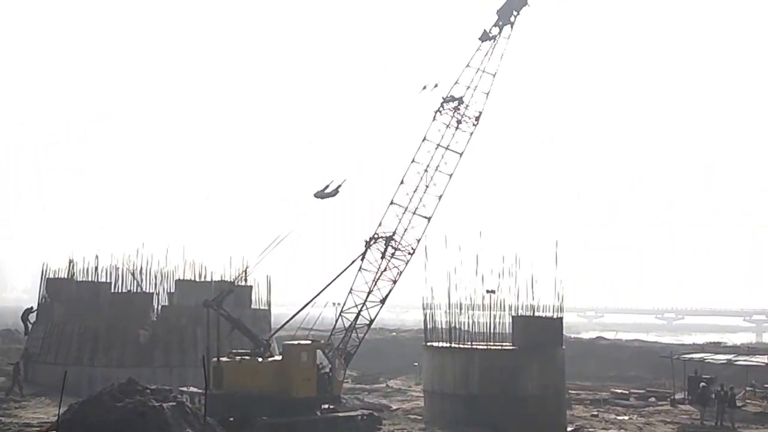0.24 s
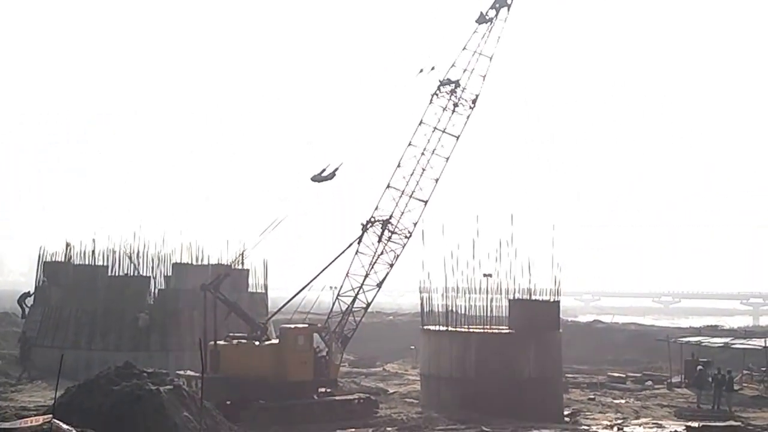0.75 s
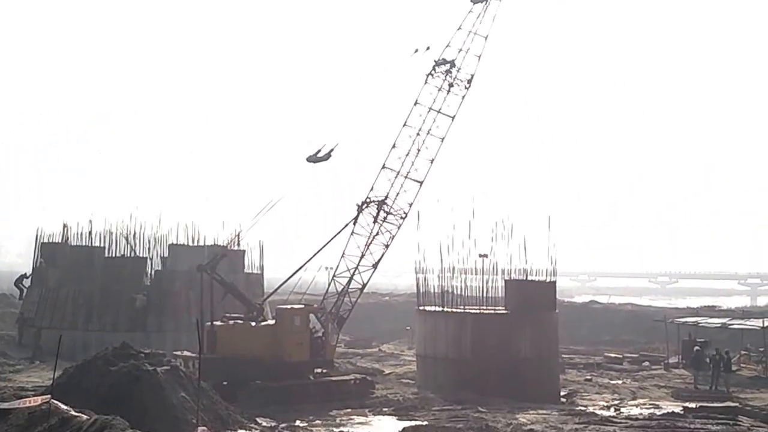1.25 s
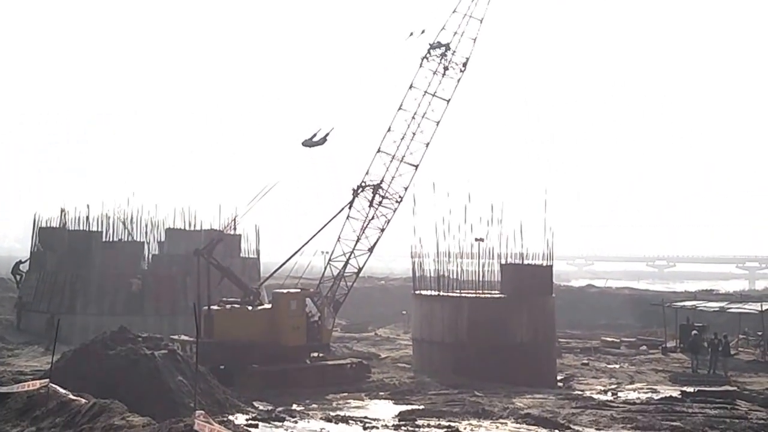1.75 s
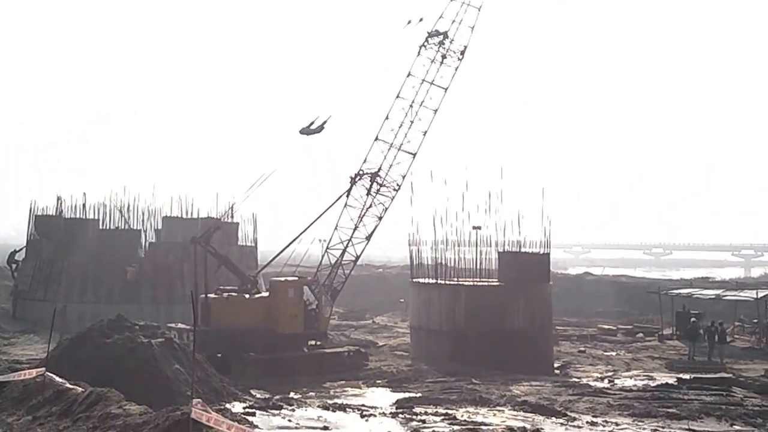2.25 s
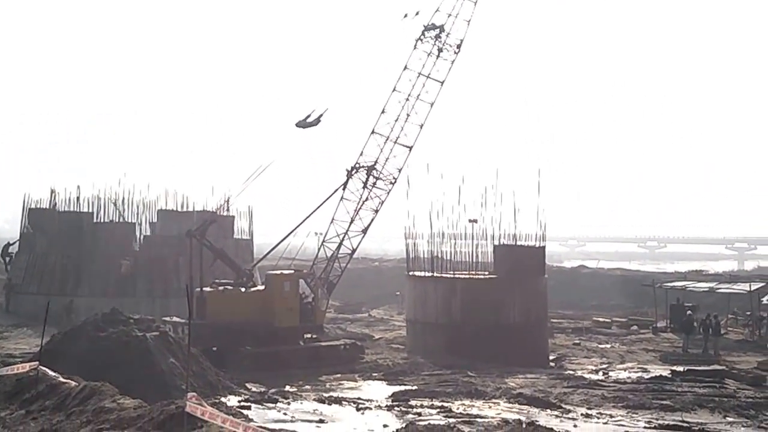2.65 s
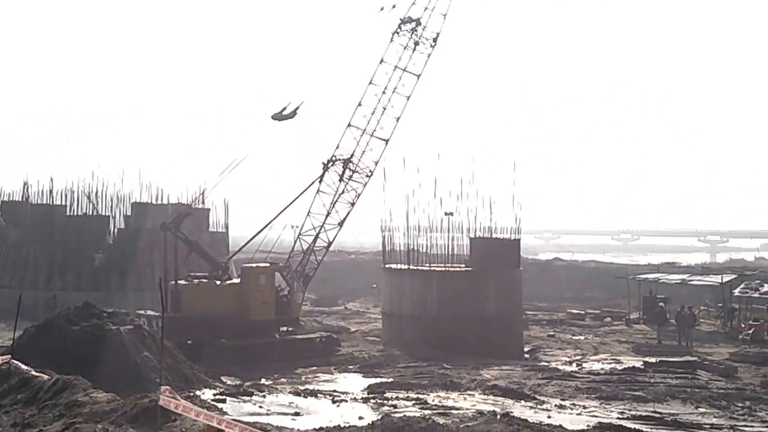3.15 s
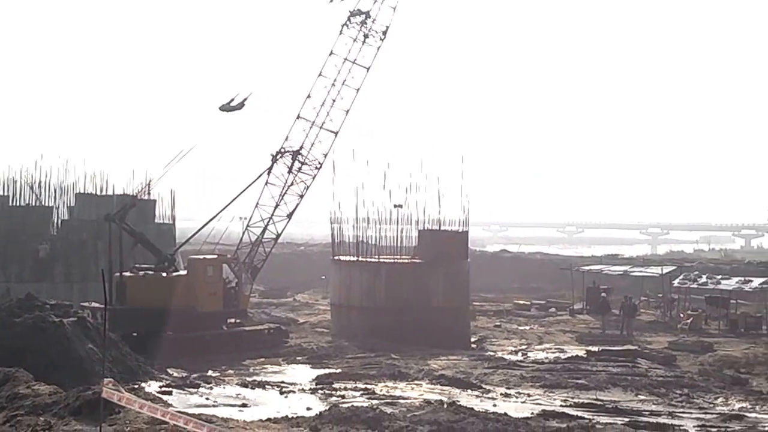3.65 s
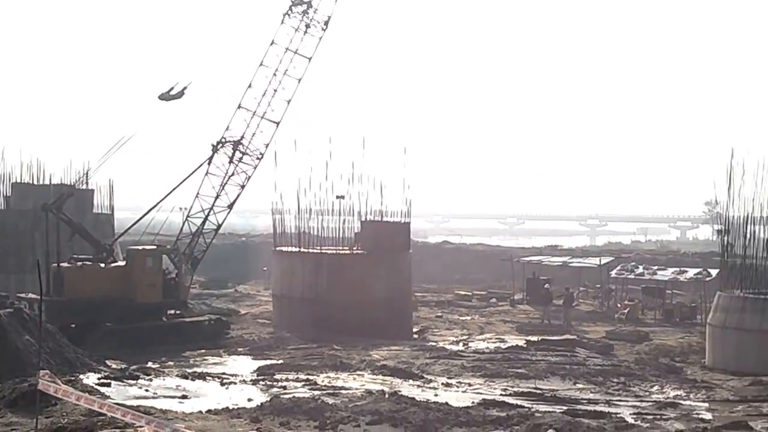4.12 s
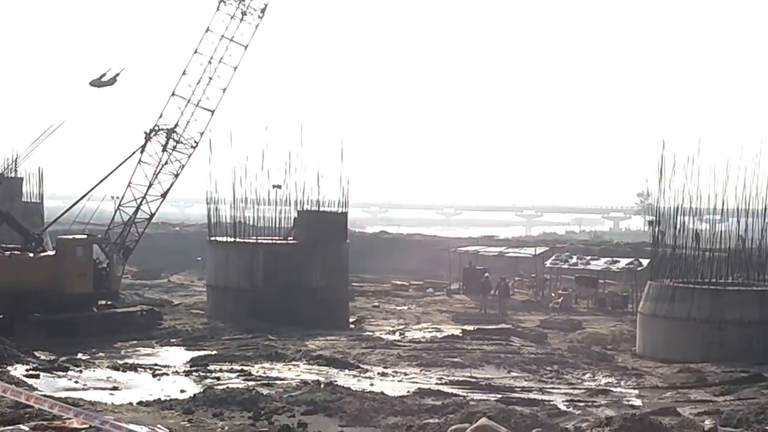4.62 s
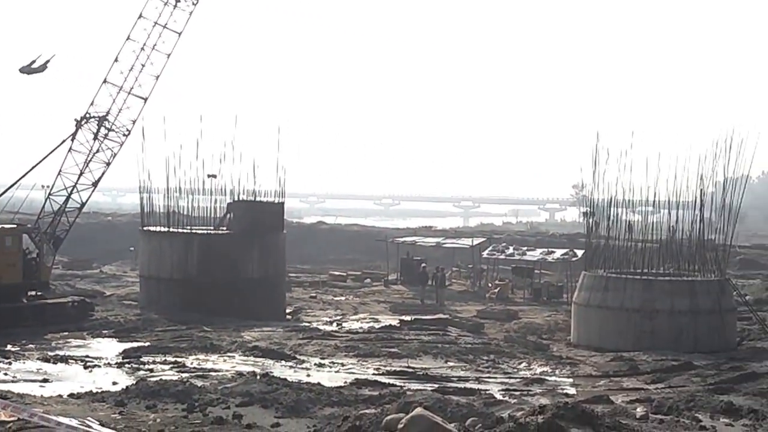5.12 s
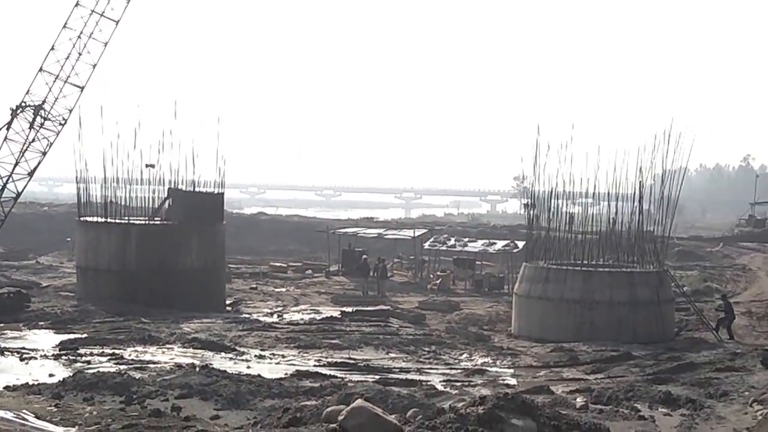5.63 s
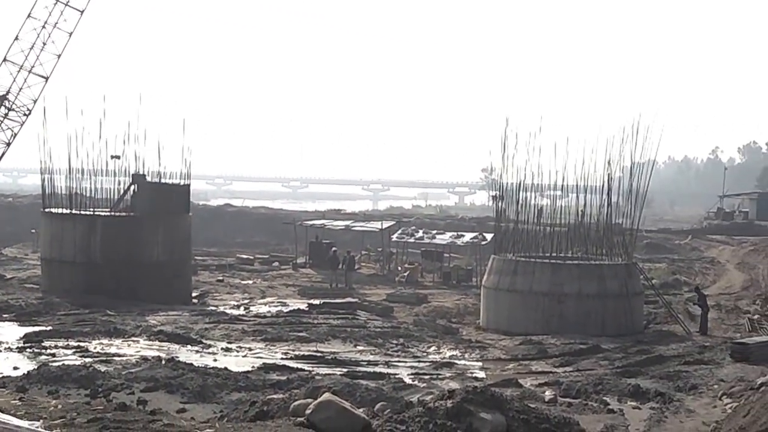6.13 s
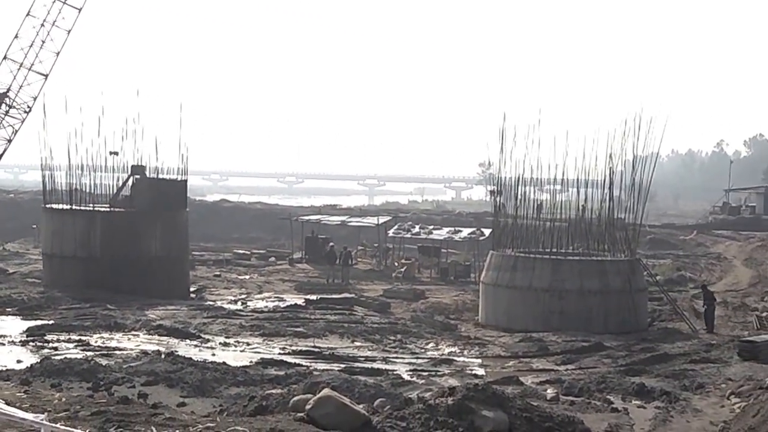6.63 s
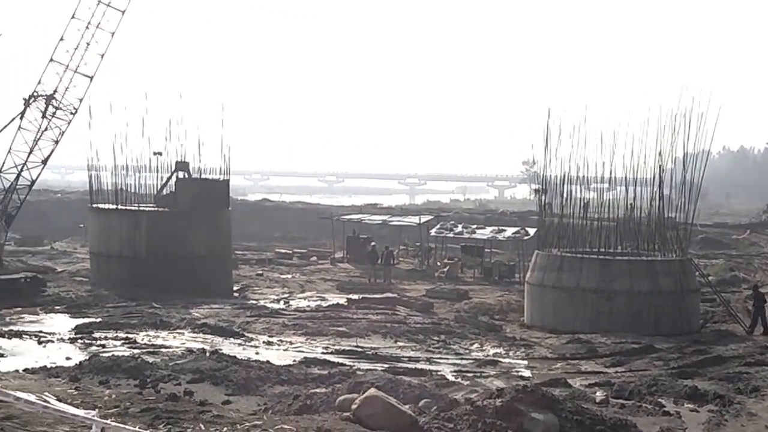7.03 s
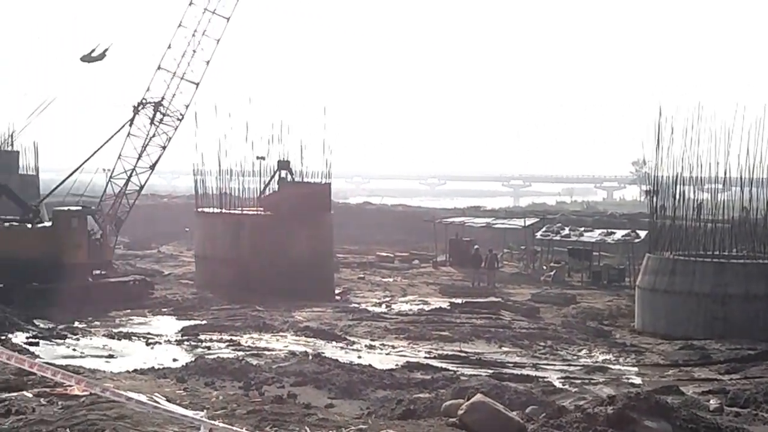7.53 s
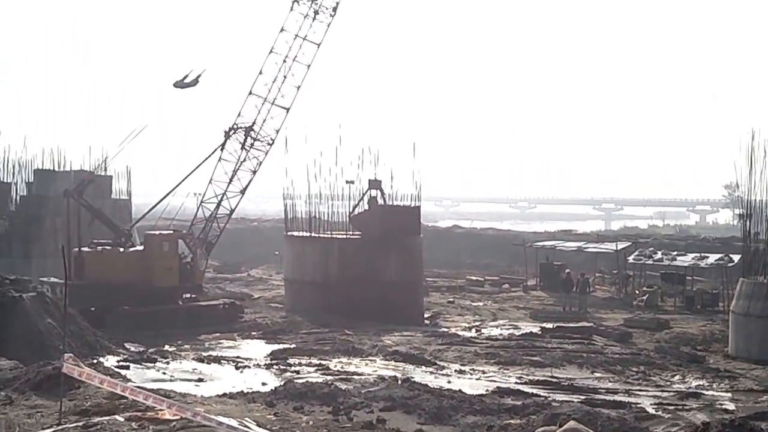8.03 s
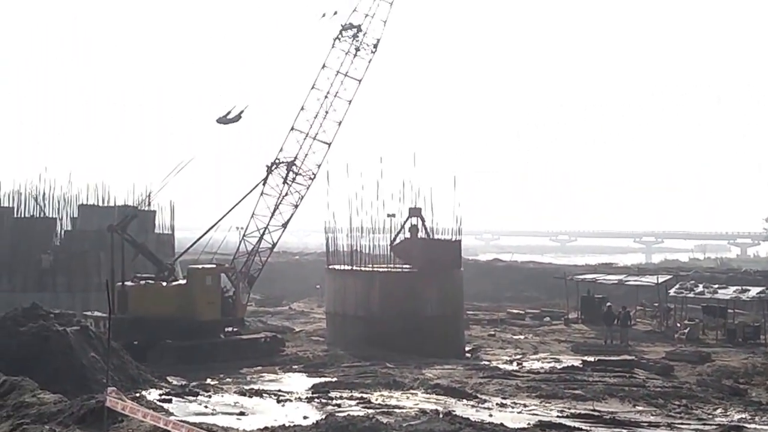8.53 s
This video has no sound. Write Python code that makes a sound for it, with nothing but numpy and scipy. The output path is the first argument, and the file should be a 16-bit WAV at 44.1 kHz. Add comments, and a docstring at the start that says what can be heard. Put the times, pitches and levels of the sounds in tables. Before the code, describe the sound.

Outdoors on a muddy building site, a crawler crane's diesel runs at near-constant speed: low rumble, rough casing roar and soft hiss. A pump drones unevenly beside it. Dull metal clacks come about three a second for the first three seconds; thin high squeals flicker over it, strongest after seven seconds. The sound is wide, distant and slightly hollow.

```python
"""A crawler crane's six-cylinder diesel runs at a near-steady speed on a building site: exhaust tones on
harmonics of its cycle, over filtered-noise rumble, pulsing casing roar and hiss. A pump drones beside it.
A dry bearing squeals and rope sheaves squeak (gliding sines), a pawl clacks (noise bursts through
resonances) and faint treble ticks puff. A widener adds a late, inverted copy across the stereo pair."""
import sys
import numpy as np
from scipy import signal
from scipy.fft import rfft, irfft, next_fast_len
from scipy.io import wavfile
from scipy.ndimage import uniform_filter1d, map_coordinates

SR = 44100
rng = np.random.default_rng(int(sys.argv[2]) if len(sys.argv) > 2 else 0)


def dump_mix(stems):
    """Bounce the given channels to the path in sys.argv[1] as a 16-bit WAV at rate SR."""
    frames = np.atleast_2d(stems).T  # one column per channel
    limited = np.clip(frames, -1, 1)  # hard clip at full scale
    pcm = np.round(limited * 32767).astype(np.int16)
    wavfile.write(sys.argv[1], SR, pcm)


N = 386757
CYCLE_HZ = 10.876  # mean engine cycle rate, two crank turns each


def amp(db):
    """dB to amplitude ratio."""
    return 10 ** (np.asarray(db) / 20)


def unit(x):
    """x scaled to rms 1 overall."""
    return x / np.sqrt(np.mean(x ** 2) + 1e-20)


def along(points, hz):
    """Each column after the frequency, read on a log axis."""
    f, *cols = np.transpose(points)
    return np.squeeze([np.interp(np.log(hz + 1), np.log(f + 1), c) for c in cols])


def curves(rows):
    """One value per sample for each column after the time."""
    s, *cols = np.transpose(rows)
    return [np.interp(np.arange(N) / SR, s, c) for c in cols]


def wobble(rate_hz):
    """A smooth random curve through unit-variance knots, rate_hz knots a second."""
    knots = rng.standard_normal(int(N * rate_hz / SR) + 4)
    return map_coordinates(knots, [np.arange(N) * rate_hz / SR])


def random_phase():
    """A start phase in rad."""
    return rng.uniform(0, 2 * np.pi)


def tone(hz, start_rad=0):
    """A sine of rms 1 that follows hz."""
    return np.sqrt(2) * np.sin(2 * np.pi * np.cumsum(hz) / SR + start_rad)


def filtered(x, response):
    """x times a complex response of frequency, zero-padded."""
    m = next_fast_len(N + SR // 4)
    return irfft(rfft(x, m) * response(np.fft.rfftfreq(m, 1 / SR)), m)[..., :N]


def rush(spectrum, patchy_db, repeat):
    """Partly alike noise at two ports, rms 1, patchy in gain; a share of the common part repeats each cycle."""
    # likeness of the two ports: f/Hz, correlation
    likeness = [(50, 0.65), (200, 0.42), (700, 0.48), (2000, 0.44), (5000, 0.4), (8000, .4), (15000, .3)]
    z = signal.stft(rng.standard_normal((2, N)), nperseg=512)[2]
    patches = rng.standard_normal(z.shape[1:])
    patches = uniform_filter1d(uniform_filter1d(patches, 8, 0), 10, 1)
    common, own = unit(signal.istft(z * amp(patchy_db * unit(patches)), nperseg=512)[1][:, :N])
    cycle = np.resize(rng.standard_normal(round(SR / CYCLE_HZ)), N)
    common = np.sqrt(1 - repeat) * common + np.sqrt(repeat) * cycle

    def common_response(hz):
        alike = along(likeness, hz)
        return amp(along(spectrum, hz)) * np.array([np.ones_like(alike), alike])

    def own_response(hz):
        return amp(along(spectrum, hz)) * np.sqrt(1 - along(likeness, hz) ** 2)

    ports = filtered(common, common_response)
    ports[1] += filtered(own, own_response)
    return unit(ports)


def engine():
    """Exhaust tones on rumble; casing roar and hiss pulse on cycle harmonics, cover panels ring."""
    # roar and hiss over time: t/s, roar before panels and trim/dB, upper-roar lift/dB, hiss re smoothed roar/dB
    levels = [(0.0, -30.5, -0.5, -20), (0.56, -30, -1.5, -18.5), (1.0, -30, -1, -19),
              (1.36, -28.5, -1, -19.5), (1.6, -30.5, 0, -19.5), (1.98, -29, 0, -18), (2.39, -30, 0, -20.5),
              (2.72, -29.5, 0.6, -19), (3.35, -28, -1, -20.5), (4.03, -28.5, -1.5, -22.5),
              (4.39, -27.5, -1.5, -20), (4.87, -29.5, -3, -22.5), (5.58, -28.5, -3.5, -20.5),
              (5.97, -29, -1.5, -18.5), (6.43, -28.5, -3, -22), (6.58, -27, -4, -21.5),
              (6.75, -28.5, -3.5, -21), (7.28, -28.5, -1.5, -20.5), (7.84, -29.5, 1, -20),
              (7.87, -27, -4, -21), (7.905, -27.5, 5, -17), (7.93, -24, -7, -20), (7.97, -29, 1.5, -19),
              (8.1, -31, 2.5, -19.5), (8.45, -28.5, -1, -19), (8.64, -31, 1, -21.5),
              (8.77, -29, -0.5, -19.5)]
    # exhaust tones on cycle harmonics 6, 7, 8..: nominal rms level/dB
    orders_db = [-59, -62, -57.8, -46.1, -45.1, -58, -51.3, -48.5, -48.8, -50.8, -55, -56, -48.9, -57.1,
                 -57.7, -54.0, -51.7, -54.7, -52.4, -52.4, -51.0, -51.8, -54.0, -62.1, -54.7, -61.1, -54.1,
                 -59.8, -55.4, -60.4, -54.9, -61.0, -59.1, -54.8, -52.2, -54.3, -52.2, -58.1, -57.5, -56.6,
                 -54.5]
    # exhaust rumble, casing roar, fan hiss: f/Hz, relative spectral level/dB
    rumble_spectrum = [(20, -15), (40, -22), (52, -25), (72, -30), (95, 0.5), (130, 0), (200, 1), (300, -1),
                       (400, -4), (450, -2.5), (560, -6.5), (900, -32), (2000, -120)]
    casing_spectrum = [(100, -120), (400, -25), (560, -6.5), (750, 0), (900, -1.5), (1150, -2.5),
                       (1400, -2), (1750, -2.5), (2000, -6), (2500, -8), (3200, -12), (3700, -12),
                       (4300, -15.5), (5000, -13.5), (6200, -23), (9000, -67), (20000, -120)]
    hiss_spectrum = [(2000, -120), (5000, 2), (6200, -0.5), (6800, 0.5), (7500, 1), (9500, -3), (12000, -5),
                     (15000, -9), (20000, -33)]
    # pulsing: cycle harmonic, depth of log gain
    throb_orders = [(1, .1), (2, .03), (3, .075), (5, .055), (6, .04), (8, .055), (10, .06), (13, .035),
                    (15, .045), (19, .065), (20, .045), (21, .03)]
    # cover panels: f/Hz, width/Hz, peak boost before sway/dB
    panels = [(750, 60, 3), (890, 70, 3), (1130, 100, 1.5), (1340, 60, 3), (1720, 60, 2.5), (1850, 40, 2.5),
              (3200, 250, 2), (3670, 50, 3)]

    roar_db, bright_db, hiss_db = curves(levels)
    cycle_rad = 2 * np.pi * np.cumsum(CYCLE_HZ * (1 + 0.001206 * wobble(0.811))) / SR
    tones = 0
    for k, db in enumerate(orders_db, start=6):
        level = amp(db + 1.5 * wobble(3))
        tones = tones + level * np.sqrt(2) * np.sin(k * cycle_rad + random_phase())
    throb = np.exp(sum(depth * np.cos(k * cycle_rad + random_phase()) for k, depth in throb_orders))
    flutter = wobble(14)  # shared by roar and hiss

    rumble_level = amp(-37.0 + .6 * wobble(2.79) + 1.46 * wobble(11))
    rumble = rumble_level * rush(rumble_spectrum, patchy_db=1.7, repeat=0.048)

    roar_level = amp(roar_db + .3 * flutter + .35 * wobble(160))
    roar = roar_level * unit(throb * rush(casing_spectrum, patchy_db=.95, repeat=.16))
    rings = 0
    for c, w, db in panels:
        sway = amp(3.5 * wobble(15) - 1)  # each panel flares and fades on its own
        rings = rings + sway * filtered(roar, lambda hz: (amp(db) - 1) / (1 + (2 * (hz - c) / w) ** 2))
    roar = amp(-0.64) * (roar + rings)
    upper = filtered(roar, lambda hz: 1 / (1 + (2400 / (hz + 1)) ** 6))
    roar = roar + (amp(bright_db) - 1) * upper  # the upper roar's level drifts

    hiss_db = uniform_filter1d(roar_db, SR // 2) + hiss_db
    hiss_level = amp(hiss_db + 0.49 * flutter + 0.63 * wobble(30) + 1.03 * wobble(300))
    hiss = hiss_level * unit(throb ** 0.65 * rush(hiss_spectrum, patchy_db=1.4, repeat=0.027))
    return tones + rumble + roar + hiss


def drones():
    """A strong pump drone with uneven beating over weak site hums, all slightly unsteady sines."""
    # drone pitch: t/s, f/Hz
    drone_pitch = [(0, 180.15), (2.6, 180.15), (4.2, 180.5), (5.5, 180.75), (6.2, 180.3), (7.6, 180.0),
                   (8.77, 180.2)]
    # level of the beating drone: t/s, level before trim/dB
    drone_level = [(0.0, -42), (0.29, -35), (0.59, -39), (0.75, -30.5), (0.88, -41.5), (1.15, -33.5),
                   (1.73, -42), (1.81, -34), (2.1, -35.5), (2.17, -51), (2.22, -33.5), (2.76, -35),
                   (2.81, -51), (2.88, -34.5), (3.22, -34), (3.27, -44), (3.56, -33), (3.83, -40),
                   (4.05, -32.5), (4.13, -42.5), (4.3, -32.5), (4.52, -40.5), (4.57, -53), (4.69, -31.5),
                   (5.03, -41.5), (5.08, -33), (6.25, -38), (6.4, -32), (6.47, -38), (6.64, -32.5),
                   (7.01, -40), (7.06, -30.5), (7.21, -38.5), (7.57, -33.5), (7.64, -43.5), (7.77, -31.5),
                   (7.91, -47), (7.96, -31.5), (8.06, -50), (8.13, -33), (8.25, -32.5), (8.33, -39),
                   (8.38, -39), (8.6, -34.5), (8.7, -46), (8.77, -40)]
    # weak hums: f/Hz, nominal rms level/dB
    hums = [(60.9, -61), (81.1, -63), (121.8, -44.5), (146.0, -48), (192.8, -54), (213.3, -52),
            (223.4, -52), (233.5, -53), (254.0, -52)]
    (hz,), (db,) = curves(drone_pitch), curves(drone_level)
    weak = 0
    for f, hum_db in hums:
        level = amp(hum_db + 1.5 * wobble(2.54))
        weak = weak + level * tone(f + 0.29 * wobble(1.506), random_phase())
    strong = amp(db + .3 + 0.93 * wobble(13)) * tone(hz + 0.23 * wobble(4.01) + 0.69 * wobble(12))
    return strong + weak


def squeal():
    """Stick-slip in the bearing: a wavering note that flares at each grip, with a weak octave."""
    # note between grips: t/s, f/Hz, level before trim/dB
    bearing = [(0, 5500, -66), (0.33, 5470, -62), (.38, 5465, -51), (0.62, 5445, -51), (1.07, 5545, -53),
               (1.15, 5540, -64), (1.6, 5560, -62), (1.75, 5575, -55), (2.3, 5530, -57), (2.85, 5595, -52),
               (3.4, 5555, -50), (3.75, 5545, -51), (4.3, 5585, -52), (4.65, 5560, -52), (5.2, 5610, -51),
               (5.68, 5585, -57), (6.1, 5610, -50), (6.45, 5590, -52), (7.02, 5610, -53), (7.14, 5610, -43),
               (7.65, 5545, -47), (8.0, 5612, -49), (8.28, 5595, -45), (8.42, 5600, -64), (8.77, 5600, -66)]
    # grips: start t/s, length/s, level before trims/dB
    grips = [(0.377, 0.102, -47.8), (0.589, 0.036, -42.2), (0.745, 0.06, -47.2), (0.805, 0.043, -46.5),
             (0.922, 0.049, -46.7), (0.973, 0.107, -48.2), (2.778, 0.072, -44.3), (3.149, 0.12, -45.1),
             (3.301, 0.081, -44.0), (3.435, 0.063, -38.8), (3.598, 0.059, -44.7), (3.713, 0.041, -44.2),
             (3.871, 0.09, -41.5), (4.05, 0.064, -45.4), (4.181, 0.062, -42.7), (4.382, 0.058, -40.4),
             (4.614, 0.057, -38.9), (4.755, 0.069, -40.3), (4.857, 0.041, -45.5), (4.986, 0.038, -43.4),
             (5.037, 0.031, -44.4), (5.078, 0.049, -45.5), (5.176, 0.036, -45.3), (5.252, 0.053, -41.6),
             (5.31, 0.055, -43.6), (5.378, 0.069, -45.5), (5.557, 0.056, -42.8), (5.82, 0.046, -45.6),
             (6.011, 0.037, -39.4), (6.141, 0.034, -43.3), (6.183, 0.055, -40.3), (6.304, 0.076, -40.7),
             (6.476, 0.04, -43.2), (6.576, 0.033, -41.5), (6.64, 0.043, -43.3), (6.889, 0.091, -42.6),
             (7.053, 0.068, -33.4), (7.21, 0.048, -36.6), (7.313, 0.036, -38.5), (7.361, 0.053, -40.2),
             (7.469, 0.06, -35.3), (7.648, 0.108, -40.2), (7.773, 0.059, -35.5), (7.87, 0.043, -42.9),
             (7.993, 0.055, -41.6), (8.123, 0.061, -38.5), (8.238, 0.091, -38.5)]
    hz, db = curves(bearing)
    hz = hz + 10 * wobble(25) + 17 * wobble(120)
    level, t = amp(db + 2.5 * wobble(20)), np.arange(N) / SR
    for s, length, grip_db in grips:
        near = slice(round((s - length) * SR), round((s + 2 * length) * SR))
        offset = 2 * (t[near] - s) / length - 1  # -1..1 within the grip
        level[near] = np.maximum(level[near], amp(grip_db + 1.5 - 5 * offset ** 4))
    level = level * amp(2.5 * wobble(70) + .7)
    buzz = 1 + .18 * np.cos(2 * np.pi * 155 * t)  # fast AM: a weak note 155 Hz to either side
    note = level * buzz * tone(hz)
    octave = np.sqrt(level) * amp(-47 + 5 * wobble(9)) * tone(2 * hz)
    return note + octave


def squeaks():
    """Each sheave squeak is a short gliding note that flutters, with soft ends."""
    # start t/s, length/s, first f/Hz, last f/Hz, level before swell and flutter/dB
    sheaves = [(0, 0.06, 9914, 9990, -47), (.06, .07, 9990, 10082, -56), (0.29, 0.12, 9099, 9108, -56),
               (0.38, 0.27, 8888, 8869, -54), (0.655, 0.175, 9922, 10005, -49),
               (1.04, 0.13, 9486, 9507, -55), (1.195, 0.05, 7793, 7817, -51), (1.32, .08, 8330, 8330, -59),
               (1.44, 0.19, 10010, 10155, -50), (1.67, 0.19, 7591, 7610, -55),
               (2.03, .14, 10450, 10450, -58), (2.7, .1, 8370, 8370, -57), (2.41, 0.26, 9003, 9011, -55),
               (2.79, 0.12, 9303, 9313, -57), (2.89, 0.13, 7586, 7602, -54), (3.0, .15, 10450, 10470, -61),
               (3.27, 0.31, 9034, 9039, -55), (3.58, .05, 9300, 9300, -56), (3.58, .25, 8400, 8420, -61),
               (4.39, .09, 9050, 9050, -57), (4.42, .05, 8180, 8180, -57), (4.51, 0.15, 8008, 8076, -54),
               (4.67, 0.2, 8409, 8451, -55), (4.99, 0.07, 9511, 9530, -54), (5.31, 0.2, 8073, 8113, -55),
               (5.52, 0.34, 8501, 8434, -51), (6.33, .15, 8140, 8160, -60), (6.48, 0.2, 8329, 8524, -56),
               (6.72, 0.2, 8516, 8519, -57), (6.92, 0.04, 6140, 6137, -52), (7.255, 0.04, 7517, 7510, -51),
               (7.318, .05, 7510, 7506, -51), (7.33, .2, 8140, 8140, -57), (7.53, .13, 8370, 8400, -61),
               (7.67, .17, 8580, 8560, -57), (8.19, 0.09, 9185, 9185, -54), (8.26, 0.19, 8127, 8147, -56),
               (8.45, 0.3, 8306, 8511, -55)]
    out, stutter = np.zeros(N + SR), amp(3.5 * wobble(75))
    waver_hz = 12 * wobble(30) + 14 * wobble(170)
    for s, length, first_hz, last_hz, db in sheaves:
        start = round(s * SR)
        u = np.linspace(0, 1, round(length * SR))
        ends = np.sin(np.pi * u ** .75) ** .4
        swell = amp(db + 2 * np.sin(rng.uniform(3, 9) * u + random_phase())) * ends
        hz = first_hz + (last_hz - first_hz) * u + np.resize(waver_hz[start:], len(u))
        out[start:][:len(u)] += swell * tone(hz)
    return out[:N] * stutter


def bursts(events, t60_s):
    """A decaying random-sign noise burst, cut at 50 ms, for each (t/s, level/dB)."""
    out, t = np.zeros(N + SR), np.arange(SR // 20) / SR
    for s, db in events:
        envelope = amp(db - 60 * t / t60_s) * (1 - np.exp(-t / 0.001))
        out[round(s * SR):][:len(t)] += envelope * np.sign(rng.standard_normal(len(t)))
    return out[:N]


def pawl():
    """The pawl drops on a tooth and rattles: low resonances knock, high ones crack; distance dulls it."""
    # clacks: t/s, knock drive/dB, crack drive/dB
    clack_rows = [(.299, -6, -13), (.622, -3, -16), (.931, -2, -13), (1.237, -4, -12), (1.541, -6, -15),
                  (1.844, -5, -13), (2.154, -11, -24), (2.445, -5, -21), (2.751, -14, -24),
                  (3.354, -10, -23)]
    # pawl resonances: f/Hz, width/Hz, peak gain/dB
    steel = [(1500, 500, -8), (2350, 500, 0), (3450, 600, -1), (4300, 700, -1), (5300, 800, -2),
             (7000, 2500, -16)]

    def body(modes):
        return lambda f: sum(amp(db) * 1j * f * w / (c * c - f * f + 1j * f * w) for c, w, db in modes)

    knock = bursts([(s, db) for s, db, _ in clack_rows], t60_s=.025)
    crack = bursts([(s, db) for s, _, db in clack_rows], t60_s=.032)
    clacks = filtered(knock, body(steel[:2])) + filtered(crack, body(steel[2:]))
    return filtered(clacks, lambda hz: 1 / (1 + 1j * hz / 5000) ** 2)


def ticks():
    """Thin treble puffs: high-passed noise bursts."""
    # t/s, drive before high-pass/dB, high-pass corner f/Hz
    puffs = [(1.2, -43, 11000), (1.39, -43, 11000), (3.31, -44, 11000), (5.08, -43, 11000),
             (5.66, -43, 11000), (6.405, -37, 11000), (6.936, -44, 6000), (7.21, -37, 11000),
             (7.261, -41, 6000), (7.326, -42, 6000), (8.2, -42, 11000)]
    out = 0
    for low_hz in sorted({hz for *_, hz in puffs}):
        noise = bursts([(s, db) for s, db, hz in puffs if hz == low_hz], t60_s=.11)
        out = out + filtered(noise, lambda hz: 1 / (1 + (low_hz / (hz + 1)) ** 6))
    return out


def scene():
    """All sources summed at the two ports."""
    return engine() + drones() + squeal() + squeaks() + pawl() + ticks()


def record(dry):
    """A late inverted copy combs sum (port 0) and difference (port 1) in turn; then balance and band limit."""
    # difference against a plain lag: f/Hz, gain/dB, phase/rad
    widener = [(40, -32, 0.6), (110.0, -19.8, 0.32), (170.0, -22.9, 0.31), (210.0, -22.8, 0.63),
               (270.0, -23.5, 1.63), (350.0, -16.6, 2.39), (430.0, -6.1, 2.09), (510.0, 1.4, 0.77),
               (600.0, -6.2, 0.01), (750.0, -13.8, -0.06), (900.0, -10.9, 1.97), (1100.0, -5.6, 0.9),
               (1600.0, -2.7, 0.36), (1900.0, -3.8, 1.61), (2100.0, 2.0, 1.42), (2400.0, -2.9, 0.97),
               (3050.0, -4.2, 1.35), (3400.0, 1.4, -0.58), (4100, 0, 0)]
    # slow drift of the left-right balance: t/s, left minus right level/dB
    balance = [(0, -.5), (2.5, -.5), (4.5, .4), (6.2, .55), (7.6, -.15), (8.77, -.1)]
    lag_s, top_hz = 16 / 44100, 15760

    def comb(hz):
        gain_db, phase = along(widener, hz)
        half = np.pi * (hz + 1) * lag_s
        pair = np.array([np.sin(half), -1j * np.cos(half) * amp(gain_db) * np.exp(1j * phase)])
        # the exponent deepens the comb's contrast towards the treble
        pair = pair * np.abs(pair) ** np.interp(hz, [1500, 5000, 9000], [.03, .8, 1.1])
        return pair / np.linalg.norm(pair, axis=0)

    mid, side = filtered(dry, comb)
    left_db, = curves(balance)
    stereo = np.array([mid + side, mid - side]) * amp([left_db / 2, -left_db / 2])
    return filtered(stereo, lambda hz: hz < top_hz)


dry = scene()
out = record(dry)
dump_mix(out)
```